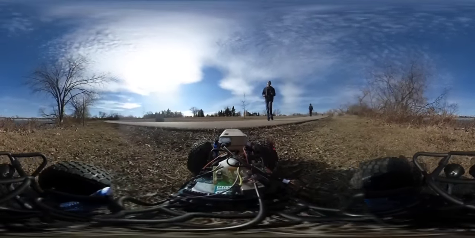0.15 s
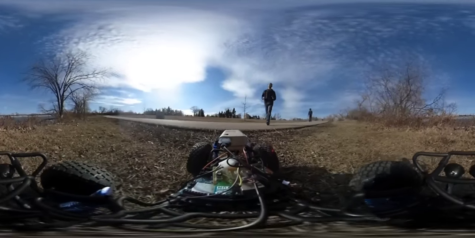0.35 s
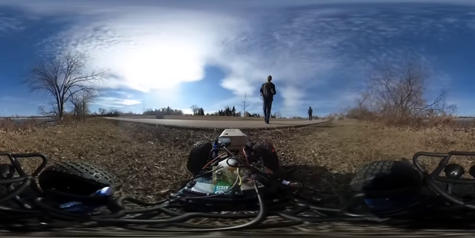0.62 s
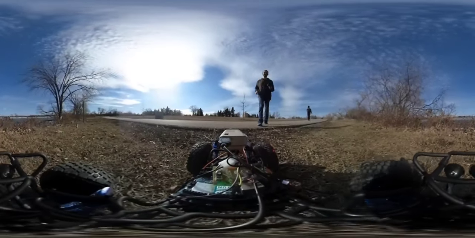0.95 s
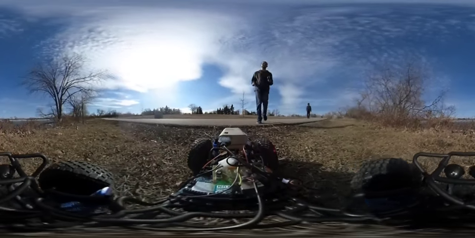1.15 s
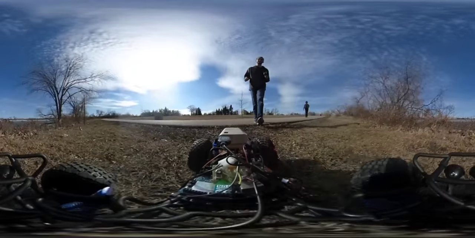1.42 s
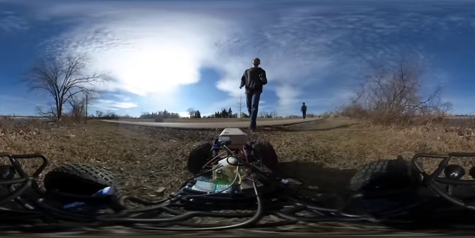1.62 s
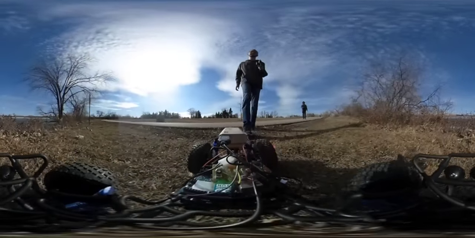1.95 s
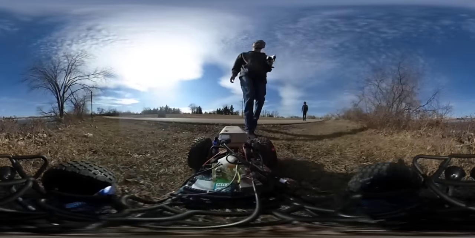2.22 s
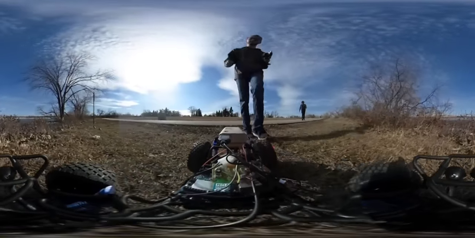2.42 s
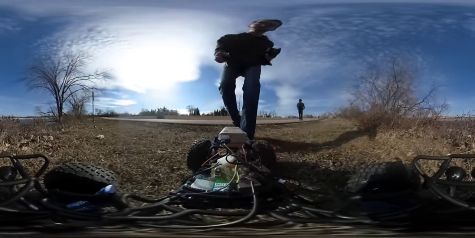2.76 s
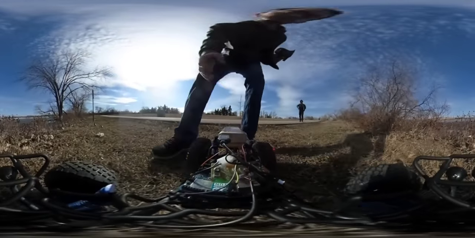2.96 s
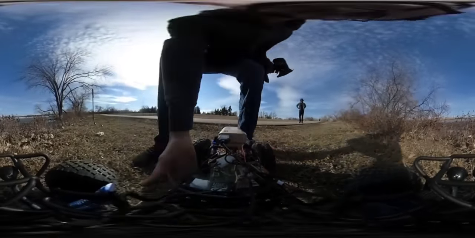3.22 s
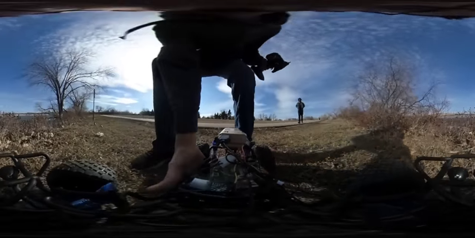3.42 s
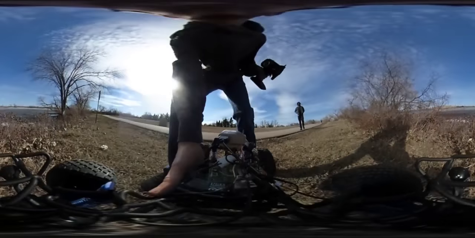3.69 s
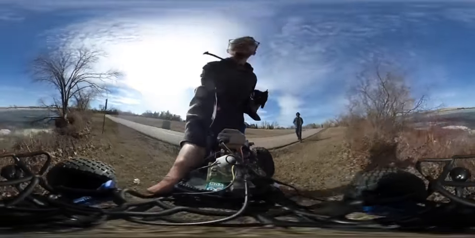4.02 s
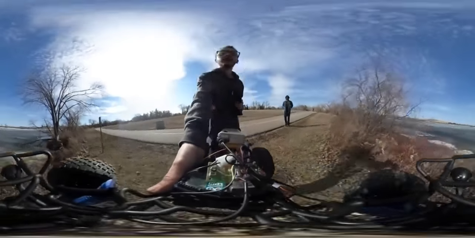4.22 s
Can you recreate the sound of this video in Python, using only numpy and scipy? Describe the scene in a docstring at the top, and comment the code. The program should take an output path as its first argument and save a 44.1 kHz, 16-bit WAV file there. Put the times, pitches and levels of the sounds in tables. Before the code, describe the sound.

On a windy roadside, a microphone on a radio-controlled car picks up several short throttle bursts: gears whine, tyres tear dry grass and blows ring the chassis, the loudest overloading. Between them twigs snap over low wind rumble. After a quieter gap, the car is knocked and dragged by hand with dull rattles and crisp cracks, ending in a faint, thin whir.

```python
"""Throttle bursts whine and churn through dry grass at a roadside while wind rumbles on the microphone.
The microphone rides on the chassis of a radio-controlled car, so tyres, gears and blows are all close.
Dense random ticks make the grass, shaft harmonics the gears, ringing modes the knocks, short runs of
cracks the twigs, and shaped noise the wind. Later the car is dragged by hand; a thin whir ends it.
The loudest blows overload the microphone."""
import sys
import numpy as np
from scipy import signal
from scipy.fft import rfft, irfft
from scipy.io import wavfile
from scipy.ndimage import uniform_filter1d

SR = 44100
rng = np.random.default_rng(int(sys.argv[2]) if len(sys.argv) > 2 else 0)


def log_audio(samples):
    """Write samples as a 16-bit WAV file to the path given in sys.argv[1]."""
    # one column per channel
    frames = np.atleast_2d(samples).T
    # limit to full scale, then quantise
    limited = np.clip(frames, -1, 1)
    pcm = np.round(limited * 32767).astype(np.int16)
    wavfile.write(sys.argv[1], SR, pcm)


N = 192364
TIME = np.arange(N) / SR


def amp(db):
    """Decibels to gain."""
    return 10 ** (np.asarray(db) / 20)


def unit(x):
    """Scales to rms 1."""
    return x / np.sqrt(np.mean(x ** 2) + 1e-20)


def add(mix, s, sound):
    """Mixes a sound in at time s."""
    part = mix[max(round(s * SR), 0):][:len(sound)]
    part += sound[:len(part)]


def colour(x, points):
    """Minimum-phase filter through the (pitch_hz, level_db) points, falling steeply beyond its ends."""
    size = 8192
    octave = np.log2(abs(np.fft.fftfreq(size, 1 / SR)) + 1)
    hz, db = np.transpose(points)
    at = np.log2(hz)
    octaves_outside = abs(octave - np.clip(octave, at[0], at[-1]))
    level_db = np.interp(octave, at, db) - 24 * octaves_outside
    log_gain = np.log(amp(np.maximum(level_db, -100)))
    # the Hilbert transform of the log gain supplies the phase
    response = np.exp(np.conj(signal.hilbert(log_gain)))
    taps = np.fft.ifft(response).real[:size // 2]
    return signal.oaconvolve(x, taps)[:len(x)]


def drift(hz):
    """Slow random wandering of rms 1, up to about hz changes a second."""
    f = np.fft.rfftfreq(N, 1 / SR)
    spectrum = rfft(rng.standard_normal(N)) * np.exp(-(f / hz) ** 2)
    return unit(irfft(spectrum, N))


def crackle(per_s, spread_db):
    """Random clicks of either sign, most small and a few large, scaled to rms 1."""
    size = amp(spread_db * np.minimum(rng.exponential(1, N), 4))
    sign = rng.choice([-1, 1], N)
    return unit(size * sign * (rng.random(N) < per_s / SR))


def patchy(x, patchy_db):
    """Every contact has its own pitch: the colour shifts at random from moment to moment; rms 1."""
    z = signal.stft(x, nperseg=512)[2]
    field = uniform_filter1d(rng.standard_normal(z.shape), size=5, axis=0)  # across pitch
    field = uniform_filter1d(field, size=3, axis=1)  # across time
    shifted = signal.istft(z * amp(patchy_db * unit(field)), nperseg=512)[1]
    return unit(shifted[:len(x)])


def low_pass(x, hz):
    """Steep band limit."""
    taps = signal.firwin(301, hz, window=("kaiser", 8), fs=SR)
    return signal.oaconvolve(x, taps, "same")


def bump(s, width):
    """A smooth rise to 1 and fall, centred on time s."""
    return np.exp(-((TIME - s) / width) ** 2)


def swell(t, rise, fall):
    """Grows up to t = 0 and dies away after it."""
    return np.exp(np.minimum(t, 0) / rise - np.maximum(t, 0) / fall)


def stroke(start, length, rise_s, fall_db_per_s):
    """Attack, hold and release."""
    age = np.maximum(TIME - start, 0)
    attack = 1 - np.exp(-age / rise_s)
    return attack * amp(-fall_db_per_s * np.maximum(age - length, 0))


def strokes(rows, rise_s):
    """Gains of the body and of the crisp stalks over several strokes, each starting fast and dying away."""
    body, crisp = np.zeros((2, N))
    for start, length, db, crisp_db, fall in rows:
        gain = amp(db) * stroke(start, length, rise_s, fall)
        body += gain
        crisp += gain * amp(crisp_db)
    return body, crisp


# gusts on the microphone: time_s, half_width_s, rise_db (over the breeze)
GUSTS = [(0.421, 0.52, 4.5), (1.04, 0.095, 7), (2.78, 0.094, 3.5), (3.27, 0.44, 6), (3.78, 0.378, 3.5)]
# soft swishes, likely the driver's jacket: time_s, half_width_s, level_db
SWISHES = [(2.77, .03, -53.5), (3.073, 0.058, -43.5), (4.13, 0.044, -61), (4.34, 0.046, -62)]
# spectra of wind rumble, gust buffeting, grass rustle and fine hiss: pitch_hz, relative level_db
WIND = [(20, -1), (50, 0), (90, -1.5), (160, -6), (260, -15.5), (500, -29)]
BUFFET = [(90, -9), (170, 0), (260, -0.5), (450, -9.5), (1100, -42.5)]
RUSTLE = [(450, 4.5), (640, 3.5), (800, 0), (1400, -6.5), (2200, -15), (3000, -24)]
HISS = [(2000, -13), (4000, 11), (8000, 8), (12000, 18)]
BREEZE_DB, BUFFET_DB, RUSTLE_DB, HISS_DB = -28.03, -28, -40.5, -65  # buffeting: at the strongest gust
BUFFET_GROWTH = 1.47  # dB of buffeting for each dB of gust
STIR_S = 0.12  # the grass takes this long to start rustling


def roadside():
    """Lumpy wind on the microphone that brightens in gusts, a faint rustle and a hiss that swells in swishes."""
    gust_db = BREEZE_DB + sum(db * bump(s, width) for s, width, db in GUSTS)
    lumpy_wind = rng.standard_normal(N) * amp(3.3 * drift(31))
    wind = amp(gust_db) * unit(colour(lumpy_wind, WIND))
    buffet_db = BUFFET_GROWTH * (gust_db - gust_db.max()) + BUFFET_DB
    lumpy_buffet = rng.standard_normal(N) * amp(3.67 * drift(34.5))
    buffet = amp(buffet_db) * unit(colour(lumpy_buffet, BUFFET))
    grass_ticks = crackle(2900, 3.0) * amp(2.5 * drift(27))
    rustle = amp(RUSTLE_DB) * np.minimum(TIME / STIR_S, 1) * unit(colour(grass_ticks, RUSTLE))
    hiss_gain = amp(HISS_DB) + sum(amp(db) * bump(s, width) for s, width, db in SWISHES)
    hiss = hiss_gain * unit(colour(crackle(10700, 5.3), HISS))
    return wind + buffet + rustle + hiss


# bursts of throttle: start_s, bite_s (rise), held_s, bog_s (from start until the tyres bog down),
# churn_db (relative), surge_db (extra), crisp_db (stalks against churn), whine_db, run_out_db_per_s
BURSTS = [(.029, 0.0071, 0.15, 0.14, -11.5, 0, -22, -21.5, 409),
          (0.622, .022, 0.093, 0.14, -10, 2.5, -20, -20, 276),
          (1.076, 0.005, .415, .165, -19.5, 8, -18.5, -20.5, 33.5),
          (2.011, 0.03, 0.25, 0.14, -21, 16.5, -15, -20, 48)]
FREE_HZ, SAG_HZ, BOG_DB = 600, 175, 7  # the shaft sags as the tyres bog down, and they churn less
SAG_WIDTH = 0.66  # half width of the sag as a share of bog_s
SPIN_DOWN_HZ_PER_S, SLOWEST_HZ = 1700, 400  # off the throttle
WHINE_RISE_S, WHINE_FALL_DB_PER_S = 0.053, 170  # the whine dies this much faster than the run-out
SURGE_AT_S, SURGE_S, SURGE_CRISP_DB = 0.018, 0.1, 0.5  # the tyres tear most just after they bite


def throttle():
    """Each burst surges, bogs down, spins free and runs out: gains of churn, stalks and whine, and shaft speed."""
    body, crisp, whine = np.zeros((3, N))
    hz = np.full(N, float(FREE_HZ))
    for start, bite_s, held, bog_s, db, surge_db, crisp_db, whine_db, fall in BURSTS:
        surge = bump(start + SURGE_AT_S, SURGE_S)
        bog = bump(start + bog_s, SAG_WIDTH * bog_s)
        churning = amp(db + surge_db * surge - BOG_DB * bog) * stroke(start, held, bite_s, fall)
        body += churning
        crisp += churning * amp(crisp_db + SURGE_CRISP_DB * surge)
        whine += amp(whine_db) * stroke(start, held, WHINE_RISE_S, fall + WHINE_FALL_DB_PER_S)
        off_throttle_s = np.maximum(TIME - start - held, 0)
        speed = FREE_HZ - SAG_HZ * bog - SPIN_DOWN_HZ_PER_S * off_throttle_s
        hz = np.where(TIME > start, np.maximum(speed, SLOWEST_HZ), hz)
    return body, crisp, whine, hz


def gears(hz, wobble=.032, flutter_db=7):
    """Harmonics of the motor shaft, heard through the chassis; the uneven load makes them waver."""
    turns = np.cumsum(hz * (1 + wobble * drift(145))) / SR
    orders_db = [-59.0, -8.0, -7, -15.0, -20.0]  # from the shaft rate upwards
    whine = np.zeros(N)
    for order, db in enumerate(orders_db, 1):
        flutter = amp(db + flutter_db * np.minimum(drift(135), 1))
        whine += flutter * np.sin(2 * np.pi * order * turns)
    chassis = [(400, -30.5), (1400, -5.0), (1800, -8.0), (2400, -6), (3200, -11.0)]
    return unit(colour(whine, chassis))


# tufts crushed under a rolling tyre or a shoe: start_s, length_s, level_db (relative),
# crisp_db (stalks against body), fall_db_per_s
CRUSHES = [(.289, 0.03, -16.5, -23, 600), (.368, 0.0083, -22, -18, 301), (.82, 0.022, -29.5, -20.5, 68),
           (1.63, 0.029, -28, -39, 302), (2.578, 0.086, -30.5, -21.5, 175)]
# spectra of grass heard through the chassis and of crisp stalks: pitch_hz, relative level_db
CHURN = [(330, -21.5), (470, -0.5), (570, -9.5), (670, -4), (780, -9), (900, -3.5), (1100, -6),
         (1350, -2.5), (1700, -5), (1930, -14), (2170, -8), (2500, -20.5), (3100, -21), (4000, -30)]
STALKS = [(1500, -13), (2900, 12), (3800, -2.5), (5200, 5), (6100, -5.5), (7200, -8), (11800, -11)]


def driving():
    """Tyres tear through grass: dense ticks sound through the chassis, crisp stalks crackle, gears whine."""
    body, crisp, whine, hz = throttle()
    crushed, crushed_crisp = strokes(CRUSHES, rise_s=0.002)
    clumps = amp(0.66 * drift(120))  # both layers meet the same clumps of grass
    churn = patchy(colour(crackle(3500, 3.8) * clumps, CHURN), patchy_db=3.5)
    stalks = patchy(colour(crackle(2600, 2.9) * clumps, STALKS), patchy_db=1.8)
    grass = (body + crushed) * churn + (crisp + crushed_crisp) * stalks
    return amp(2.0) * grass + whine * gears(hz)


# blows on the chassis: time_s, level_db (relative), tilt_db_per_octave, ring_time (factor)
KNOCKS = [(.052, 8, -1, 0.65), (.133, 5, -0.5, 1.26), (0.2618, -1, -5.5, 1.15), (.288, 2, -4.5, 0.68),
          (0.648, 7, 1.5, 0.7), (0.8183, 10, -2, 0.84), (1.463, -5, -10, 1.6), (1.56, 9, -5.5, 0.88),
          (1.637, 7.5, -2.5, 0.56), (1.739, -1, -7, 0.89), (1.7908, -1, -7.5, 0.74),
          (2.039, 12.5, 6.5, 0.7), (2.06, 12.5, -2, 0.58), (2.075, -1, 6, 1.01), (2.35, 12, -1, 1.07),
          (3.38, 8.5, -1, 0.36), (3.487, 9.5, -3.5, 0.65), (3.543, -1.5, 2.5, 1.2)]
# ringing modes of the chassis: pitch_hz, relative level_db, t60_s (before the blow's ring_time)
CHASSIS = [(412.5, -4, 0.048), (471.6, -1.5, 0.051), (642.4, 1, 0.084), (942, -14.5, 0.16),
           (1390, 14.5, 0.016), (1423, 0, 0.016), (1660, -0.5, 0.034), (2050, -1, 0.047),
           (2920, -16, 0.037), (3360, -53, 0.026), (4210, -4.5, 0.033), (4800, -5.5, 0.011)]
# spectrum of snapping twigs, also used for loose plastic: pitch_hz, relative level_db
TWIG = [(200, -4.5), (500, -2.5), (1400, 9.5), (2300, 0.5), (3600, -8.5), (5200, -19.5), (7000, -17),
        (12000, -24)]
# the chassis lands again: delay, dB after a 0 dB blow, and dB more for each dB of the blow
REBOUND_S, REBOUND_DB, REBOUND_GROWTH = .008, -12, 1.475


def knocks(scatter_db=0.5, crack_db=-12.0, scrape_s=0.00082, crack_s=0.003):
    """Each blow rings the chassis modes, differently for each spot, under a short clatter of loose plastic."""
    out = np.zeros(N)
    t = np.arange(-SR // 100, SR // 4) / SR
    after = np.maximum(t, 0)
    hz, mode_db, t60 = np.transpose(CHASSIS)[:, :, None]
    rebounds = [(s + REBOUND_S, REBOUND_DB + REBOUND_GROWTH * db, tilt, ring_time)
                for s, db, tilt, ring_time in KNOCKS]
    for s, db, tilt, ring_time in KNOCKS + rebounds:
        spot, detune, phase = rng.standard_normal((3, len(hz), 1))
        level = amp(mode_db + scatter_db * spot + tilt * np.log2(hz / 1000))
        onset = 1 - np.exp(-after / 0.00019)
        decay = np.exp(-np.log(1000) * after / (t60 * ring_time))
        ringing = np.sin(2 * np.pi * (hz * (1 + 0.036 * detune) * t + phase))
        modes = (level * decay * onset * ringing).sum(0)
        modes /= 2 * np.linalg.norm(level)
        # loose parts scrape just before the full blow lands
        loose_parts = patchy(colour(rng.standard_normal(len(t)), TWIG), patchy_db=3.0)
        clatter = loose_parts * swell(t, scrape_s, crack_s)
        add(out, s + t[0], amp(db) * (modes + amp(crack_db + tilt) * clatter))
    return amp(3.0) * out


# the larger twigs that snap: time_s, level_db (relative), treble_db (against the middle)
SNAPS = [(0.2287, -2.5, -2), (.2615, 1.5, -35), (.2895, -1, -6), (.372, -7, -2), (0.388, -4.5, -5),
         (0.481, -18, -7), (.511, -21, -30), (1.007, -10, -30), (1.137, -27, -34), (1.613, -5.5, 7),
         (1.829, -14, 16), (2.103, 4, -11), (2.396, -6.5, -2), (2.46, -6.5, 0), (2.588, -8.5, 3),
         (2.678, -12.5, -4), (2.961, -16, -20), (3.336, -17, 21), (3.362, -2, 4), (3.413, -11.5, 16),
         (3.515, -3, -4), (3.752, -17.5, -22), (3.821, -15.5, -5), (3.833, -13, 12), (3.959, -23, -16),
         (3.983, -9.5, -14), (4.036, -15.5, 16), (4.099, -20.5, -1), (4.237, -25, 9), (4.27, -15.5, -8)]
# small stalks that give way at random, levels relative as for the twigs
STRAYS_PER_S, STRAY_DB, STRAY_SPREAD_DB = 4.1, -35, 4


def snaps(strain_s=0.00085, fibres_s=0.0039, spread_db=6.5):
    """A twig breaks as a quick run of fibre cracks."""
    out = np.zeros(N)
    t = np.arange(-SR // 100, SR // 10) / SR
    stray_times = TIME[rng.random(N) < STRAYS_PER_S / SR]
    strays = [(s, STRAY_DB + STRAY_SPREAD_DB * rng.standard_normal(), 0) for s in stray_times]
    for s, db, treble_db in SNAPS + strays:
        fibres = crackle(6000, spread_db)[:len(t)] * swell(t, strain_s, fibres_s)
        spectrum = [(hz, level + treble_db * hz / (hz + 3000)) for hz, level in TWIG]
        add(out, s + t[0], amp(db) * unit(colour(fibres, spectrum)))
    return amp(-25.0) * out


# pulls through the grass by hand: start_s, length_s, level_db (relative), crisp_db (stalks against
# body, before the rattle's extra gain), fall_db_per_s
PULLS = [(3.346, 0.065, -22.5, -16, 319), (3.474, 0.05, -15.5, -13, 150), (3.815, 0.014, -32, -12, 155),
         (3.955, 0.079, -31, -9.5, 184), (4.234, 0.048, -37, -22, 493)]
# spectrum of the dull rattle: pitch_hz, relative level_db
RATTLE = [(380, -5.5), (650, -4.5), (1000, -7), (1500, -5.5), (2100, -14), (3500, -30.5)]


def dragging():
    """Pulled by hand with the motor off, the car rattles dully and breaks stalks more sparsely."""
    body, crisp = strokes(PULLS, rise_s=0.0027)
    clumps = amp(4.55 * drift(51))
    rattle = patchy(colour(crackle(1300, 0.81) * clumps, RATTLE), patchy_db=2.0)
    stalks = patchy(colour(crackle(1500, 3.4) * clumps, STALKS), patchy_db=2.2)
    return amp(3.5) * body * rattle + crisp * stalks


def servo(start_s=4.1, hz=2380, db=-54):
    """A thin, wavering whir, likely the steering servo, as the wheels are set down: one unsteady sine."""
    turns = np.cumsum(hz * (1 + .045 * drift(300))) / SR
    gain = amp(db + 4.9 * drift(37.4)) * swell(TIME - start_s, .03, 1)
    return gain * np.sin(2 * np.pi * turns)


def scene():
    """Everything as it reaches the microphone on the car."""
    return (roadside() + driving() + knocks() + snaps() + dragging() + servo())[None]


BAND_HZ, EDGE_HZ = 11950, 17000  # band limits before and after the overload
KNEE = 7  # higher bends more sharply into the overload


def record(dry):
    """A narrow-band microphone that overloads on the blows, then the band limit."""
    x = low_pass(dry[0], BAND_HZ)
    clipped = x / (1 + abs(x) ** KNEE) ** (1 / KNEE)
    return low_pass(clipped, EDGE_HZ)[None]


dry = scene()
out = record(dry)
log_audio(out)
```